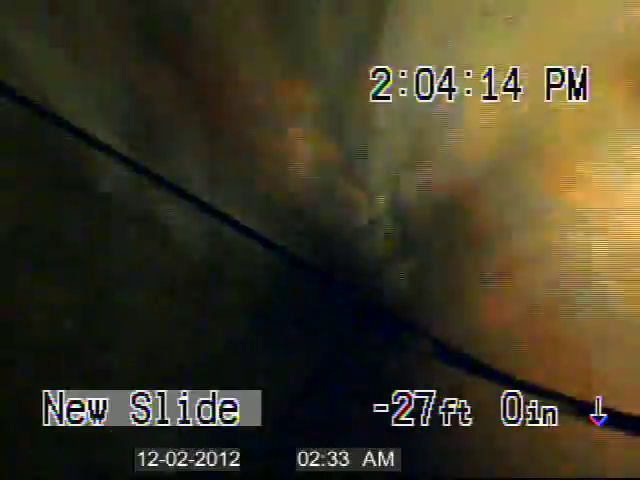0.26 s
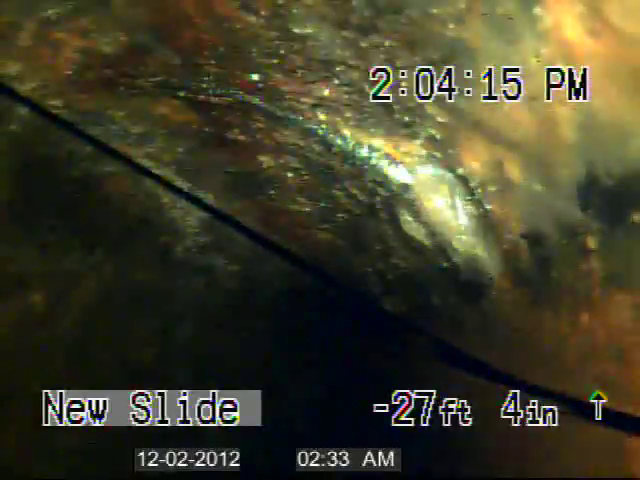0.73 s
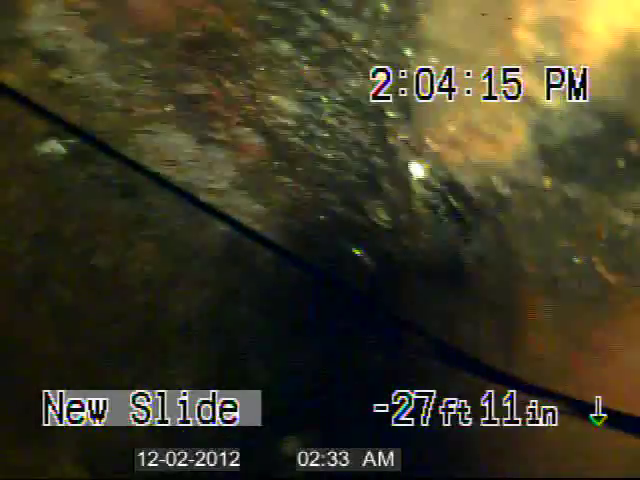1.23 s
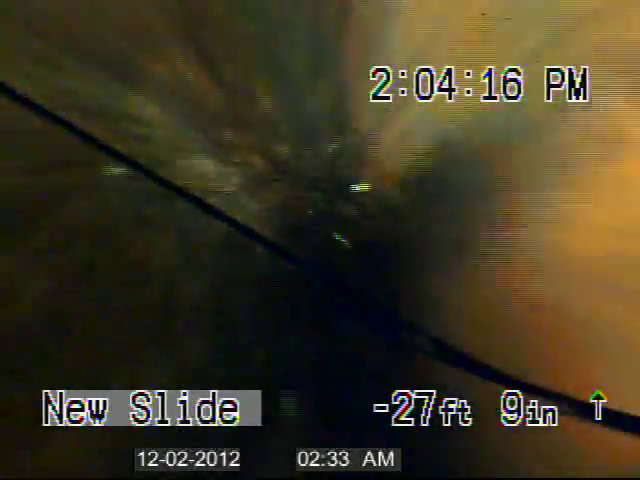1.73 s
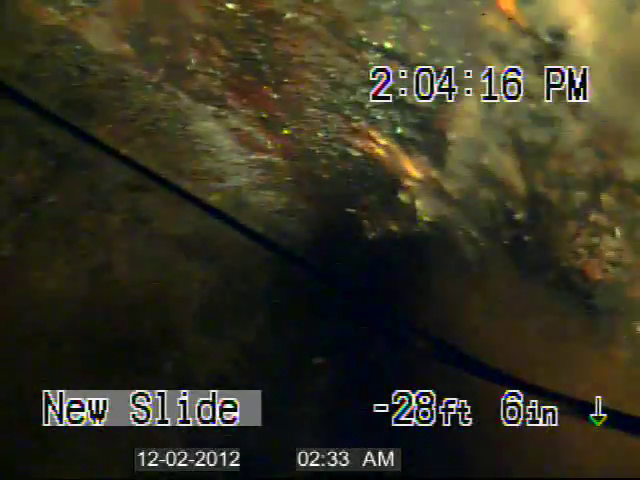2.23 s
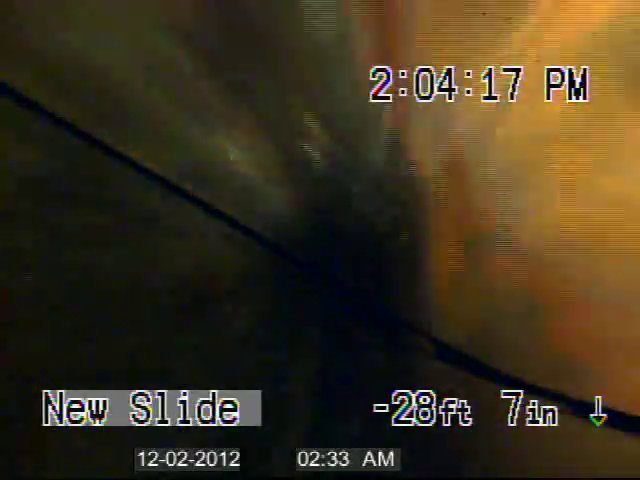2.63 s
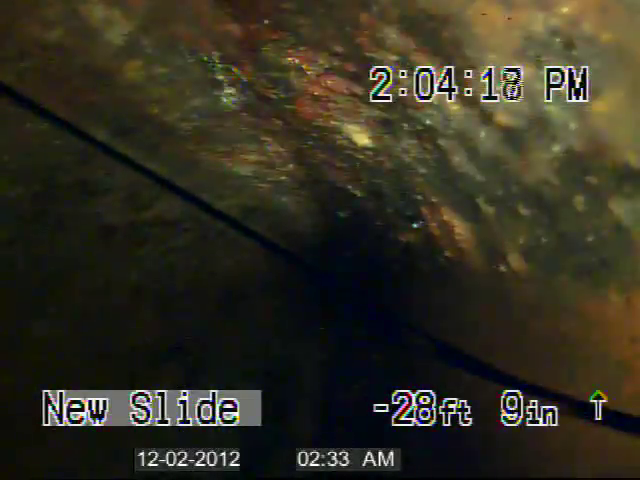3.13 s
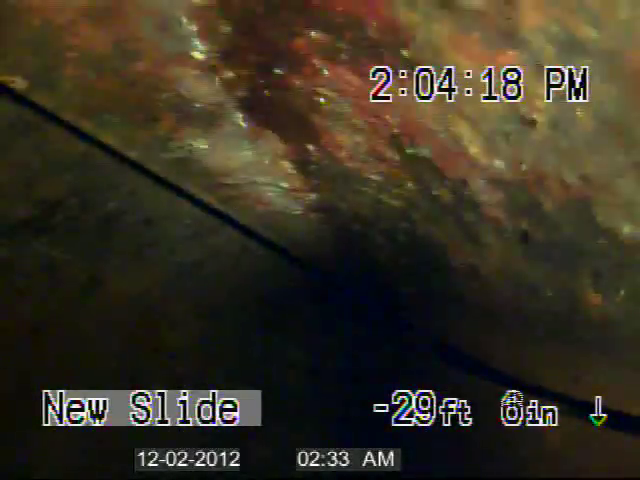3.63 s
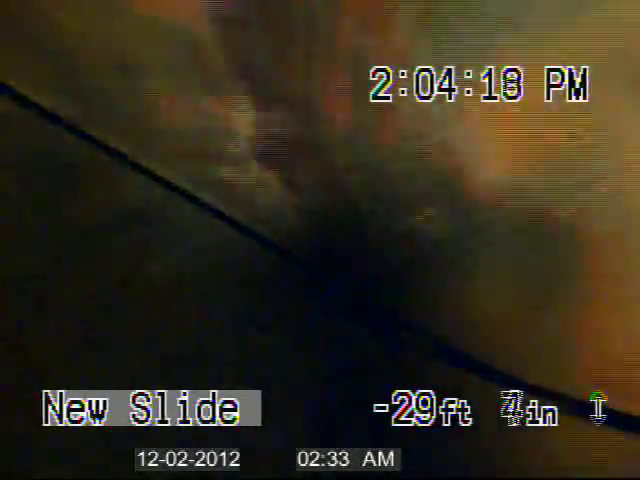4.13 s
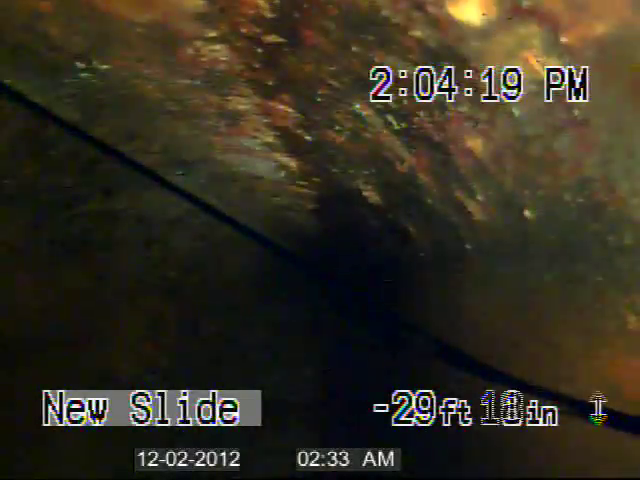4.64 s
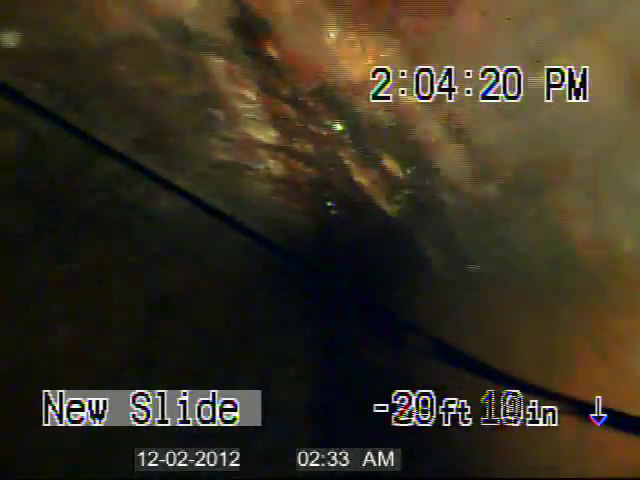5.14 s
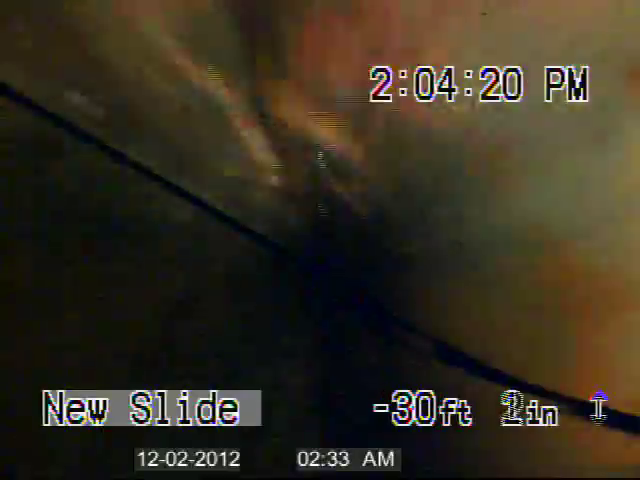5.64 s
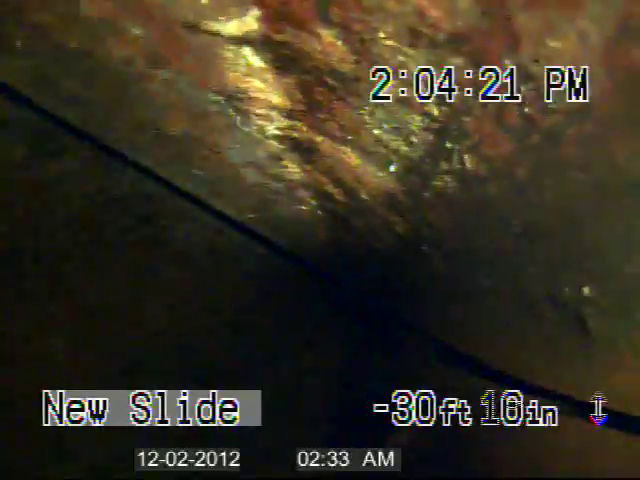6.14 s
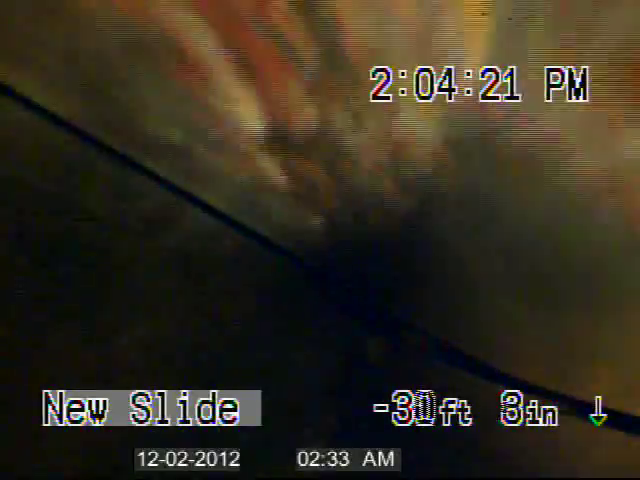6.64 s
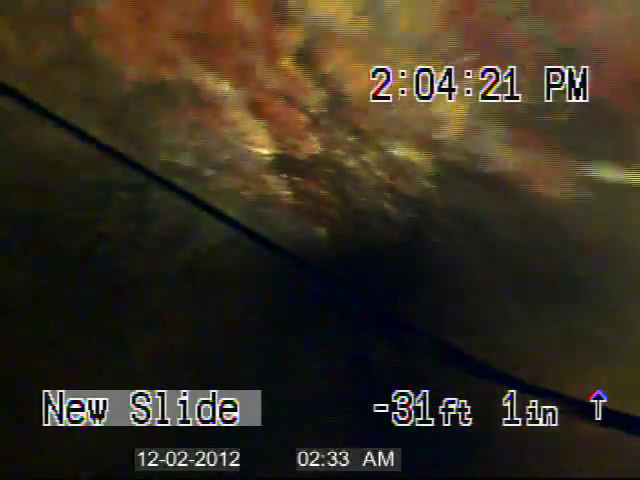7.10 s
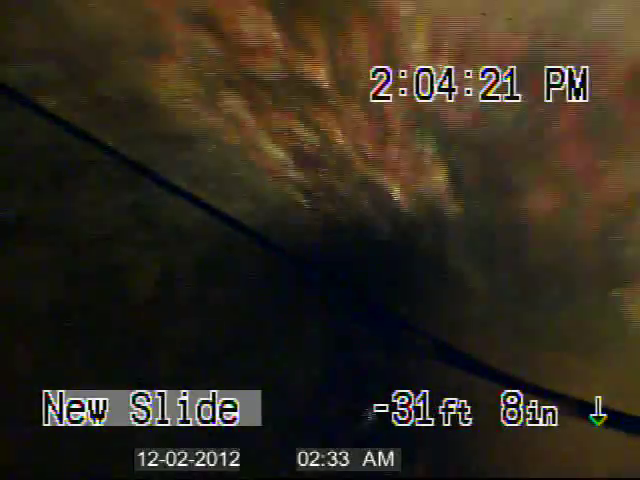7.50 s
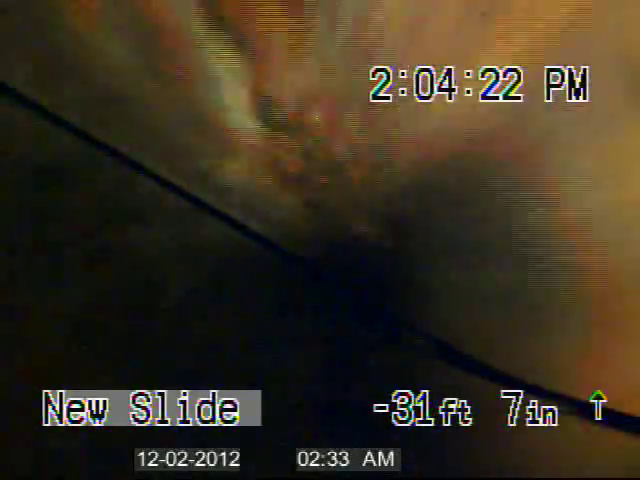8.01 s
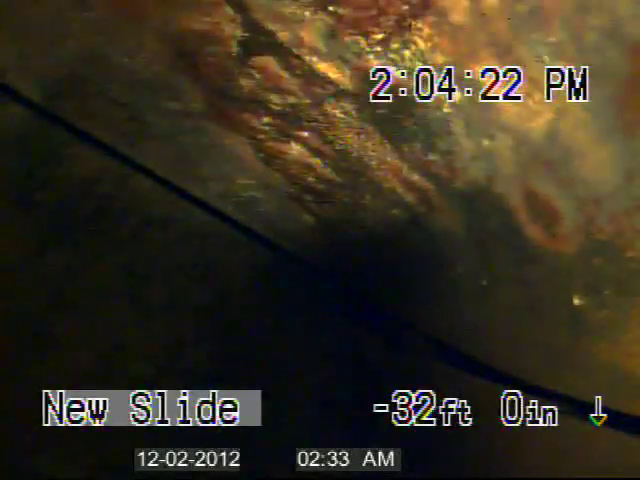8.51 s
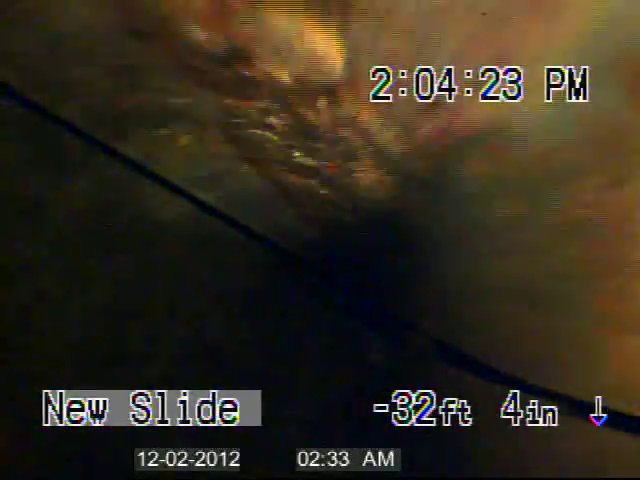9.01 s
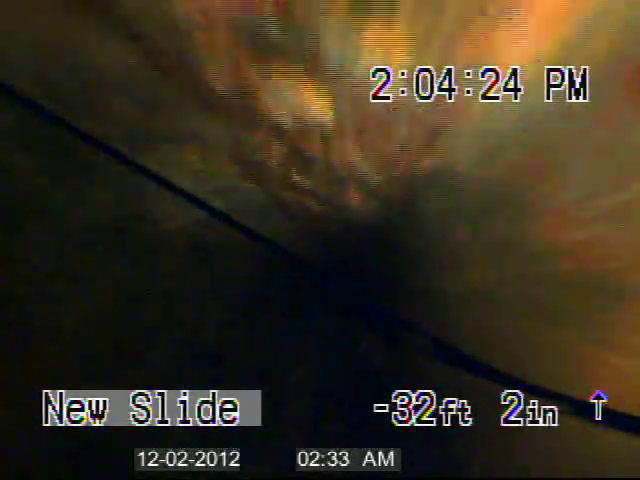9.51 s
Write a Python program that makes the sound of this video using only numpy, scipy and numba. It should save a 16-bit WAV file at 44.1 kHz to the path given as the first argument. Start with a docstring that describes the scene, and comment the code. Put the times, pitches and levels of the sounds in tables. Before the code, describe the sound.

A small hard camera head is shoved in short jerky strokes along a rusty pipe, scraping, rumbling and knocking, overloading its enclosed microphone.

```python
"""An inspection camera head is shoved along a rusty pipe in short strokes, its microphone inside the housing.
Stick-slip jolts drive the modes of body and rod, grit drives those of the thin shell, and wall knocks drive
both. Behind it the cable rumbles as low-passed noise, louder under drag, and a faint low hum wavers. Loud
strokes overload the input and square off, and a faint whine is added there; a broad treble hiss swells with the
loudness."""
import sys
import numpy as np
from scipy import signal
from scipy.io import wavfile
from scipy.ndimage import uniform_filter1d
from numba import njit

SR = 44100
rng = np.random.default_rng(int(sys.argv[2]) if len(sys.argv) > 2 else 0)


def store_pcm(level_fs):
    """Save levels as 16-bit WAV."""
    pcm = np.round(np.clip(level_fs, -1, 1) * 32767).astype(np.int16)
    wavfile.write(sys.argv[1], SR, np.atleast_2d(pcm).T)


N = 430416  # length in samples


def undb(db):
    """Level law: amplitude ratio of a level in dB."""
    return 10 ** (np.asarray(db) / 20)


def level(x, db):
    """Normalisation: scale a signal to the given rms level."""
    return x * undb(db) / np.sqrt(np.mean(x ** 2))


@njit
def svf(x, hz, width):
    """Second-order resonance: a state-variable band-pass with gain 1 at its centre."""
    y, band, low = np.empty(len(x)), 0., 0.
    g, k = np.tan(np.pi * hz / SR), width / hz
    for i in range(len(x)):
        v = (band + g * (x[i] - low)) / (1 + g * (g + k))
        band, low, y[i] = 2 * v - band, low + 2 * g * v, k * v
    return y


def lowpass(x, hz, order=2):
    """Low-pass filtering: a Butterworth response, flat below the corner."""
    return signal.sosfilt(signal.butter(order, hz, fs=SR, output="sos"), x)


def walk(rate):
    """Slow random modulation: normal random levels held 1 / rate s, then slewed twice."""
    k = int(SR / rate)
    held = np.repeat(rng.standard_normal(N // k + 1), k)
    return uniform_filter1d(uniform_filter1d(held, k), k)[:N]


def ring(x, modes, widen=1.44, patchy_db=0, passes=2):
    """Modal superposition: parallel resonances of alternating sign, their drive flickering with the contact."""
    out = 0
    for k, (hz, width, db) in enumerate(modes):
        y = x * undb(db + patchy_db * walk(30))
        for _ in range(passes):  # a second pass keeps the valleys between modes dark
            y = svf(y, float(hz), widen * width)
        out = out + (-1) ** k * y
    return out


HISS_DB, HISS_HZ, HISS_SWELL_DB = -57.5, 6940, 9.5  # level before swell and top cut, centre, swell per unit loudness


def hiss(loudness):
    """Band-limited noise: broad hiss whose level swells with the loudness of the moment."""
    steady = level(svf(rng.standard_normal(N), float(HISS_HZ), 4400.), HISS_DB)
    return steady * undb(HISS_SWELL_DB * loudness)


WHINE_HZ, WHINE_DB = 9744, -73


def whine():
    """Pure tone: a steady, faint high sine."""
    return np.sqrt(2) * undb(WHINE_DB) * np.sin(2 * np.pi * WHINE_HZ * np.arange(N) / SR)


# course of the faint low hum, interpolated between points, before its wavering: (t/s, f/Hz, rms level/dB)
HUM = [(0.0, 114.2, -17), (1.09, 118.3, -18.5), (1.301, 96.08, -21), (9.76, 103.3, -23.5)]
HUM_WAVER_HZ = 11  # scale of the random frequency waver


def hum():
    """Frequency modulation: a narrow tone, its phase the integral of a wavering frequency."""
    s, *columns = np.transpose(HUM)
    hz, db = (np.interp(np.arange(N) / SR, s, c) for c in columns)
    hz = hz + HUM_WAVER_HZ * walk(5)
    amplitude = np.sqrt(2) * undb(db + 2 * walk(12))
    return amplitude * np.sin(2 * np.pi * np.cumsum(hz) / SR)


RUMBLE_DB, RUMBLE_HZ = -11, 113  # level at 0 dB drag before its wavering, corner
RUMBLE_FOLLOWS = 0.51  # dB of rumble per dB of drag


def cable(drag_db):
    """Rolling friction noise: the cable rumbles on the pipe floor, louder while it is pushed."""
    rumble = level(lowpass(rng.standard_normal(N), RUMBLE_HZ), RUMBLE_DB)
    return rumble * undb(RUMBLE_FOLLOWS * drag_db + 2 * walk(6))


# slides of the head, long pushes, rebounds and short shuffles:
# (start t/s, attack t/s, hold t/s, release t/s, drag level/dB, change of level over the hold/dB,
#  grit level re drag/dB, upper body modes level/dB, upper shell modes level/dB)
SLIDES = [(0.0, 0.12, 0.21, 0.11, -3, 8, -24, -2, -1), (0.432, 0.064, 0.11, 0.068, 1, -3, -26.5, 1.5, 2),
          (0.722, .14, .22, .12, -9, 16, -22, -1.5, -1.5),
          (1.199, 0.052, 0.14, 0.065, -2, -0.5, -25.5, -2, 1.5),
          (1.427, 0.059, 0.0094, 0.027, -11.5, 5.5, -21.5, -2.5, -6.5),
          (1.573, 0.075, 0.26, 0.11, -8.5, 14.5, -22.5, -2.5, 0),
          (2.025, 0.069, 0.16, 0.022, 0, -6, -24.5, 3.5, 0),
          (2.318, 0.22, 0.13, .165, 2.5, 5.5, -28.5, -0.5, 2),
          (2.813, 0.042, .12, 0.066, -7, 6, -23.5, 1, -0.5),
          (3.07, 0.05, .01, 0.045, -11.5, -3.5, -28, -0.5, -2),
          (3.166, 0.19, 0.12, .09, 9.5, -0.5, -31, -4.5, 1.5),
          (3.564, 0.063, 0.13, 0.053, 2, -7.5, -26, -1, 0),
          (3.846, 0.022, 0.0073, 0.025, -5.5, -5, -28.5, 2, 4),
          (3.978, 0.11, 0.13, .178, 0.5, 5, -28, -2.5, 1), (4.365, 0.033, .09, 0.14, -7, 6, -24, 0.5, -0.5),
          (4.633, 0.024, 0.008, 0.04, -11.5, -0.5, -32, -2.5, 3.5),
          (4.753, 0.075, 0.24, 0.041, -4, 9.5, -24, -2, 1), (5.146, 0.035, 0.0056, 0.037, -4, 0, -26, 2, 2),
          (5.198, 0.04, 0.0078, 0.17, 0, 0.5, -24, -1.5, -1), (5.468, 0.038, .005, .03, -19, 7, -32, 1, 3),
          (5.534, 0.16, 0.18, 0.044, 3, -4, -27, -2, 1),
          (5.933, 0.072, 0.088, 0.11, -8, 6.5, -21.5, 4.5, -2.5),
          (6.244, .085, 0.2, 0.16, -8, 13, -23, 3.5, 1),
          (6.681, .055, 0.12, 0.12, -0.5, -6.5, -23.5, 2.5, -3),
          (6.967, 0.016, 0.0093, 0.018, -6, -1, -30, -4, 2.5),
          (7.057, .11, 0.19, 0.14, -9, 17.5, -21.5, -0.5, -0.5),
          (7.478, .04, .005, 0.048, 6, -5.5, -36, -1, -0.5),
          (7.528, 0.071, 0.17, 0.053, -5, -10, -27, 2, -2), (7.859, 0.12, 0.18, .09, 3.5, -3, -27, 0, -0.5),
          (8.257, 0.05, .005, 0.035, -1.5, -2.5, -27, 7, 0),
          (8.314, 0.049, 0.08, 0.079, 3.5, -3.5, -28, -4.5, -1),
          (8.6, 0.13, 0.17, 0.16, -8, 11.5, -22, -1.5, -0.5),
          (9.039, .025, 0.13, 0.19, -11, 10.5, -23.5, -0.5, -1),
          (9.445, 0.024, .005, 0.052, -3, 0, -37, -5, 5.5),
          (9.494, 0.044, .005, 0.057, 4, 1, -25, 1.5, 0.5),
          (9.54, 0.043, 0.13, 0.44, -4, 8.5, -23, -3.5, -1)]
REST_DB, REST_GRIT_DB = -19.5, -45.5  # drag and grit levels where a slide starts and ends
# curve exponents: 1 = straight in dB, more = rounder shoulders
ATTACK_BOW, HOLD_BOW, RELEASE_BOW = 1.15, 1.5, 1.2
GRIT_ATTACK_BOW, GRIT_RELEASE_BOW = 1.35, 1.42
RASP_SHARE, RASP_S = 0.12, 0.028  # dB of rasp per dB of rise over the hold; its time scale
GRIT_FOLLOWS = 0.71  # share of the change over the hold that the grit follows


def slides():
    """Envelope control: attack, hold and release in dB; the strongest drag sets drag, grit and colour."""
    t = np.arange(N) / SR
    out = np.zeros((4, N)) + np.array([[REST_DB], [REST_GRIT_DB], [0], [0]])
    for s, attack, hold, release, db, change_db, grit_db, upper_db, bright_db in SLIDES:
        at = slice(max(int(s * SR), 0), int((s + attack + hold + release) * SR))
        since_attack = t[at] - s - attack
        early = np.clip(1 - (t[at] - s) / attack, 0, 1)
        late = np.clip((since_attack - hold) / release, 0, 1)
        change = change_db * (1 - np.clip(1 - since_attack / hold, 0, 1) ** HOLD_BOW)
        drag_shape = 1 - early ** ATTACK_BOW - late ** RELEASE_BOW
        drag = REST_DB + (db + change - REST_DB) * drag_shape
        grit_shape = 1 - early ** GRIT_ATTACK_BOW - late ** GRIT_RELEASE_BOW
        grit_top = db + grit_db + GRIT_FOLLOWS * change
        grit = REST_GRIT_DB + (grit_top - REST_GRIT_DB) * grit_shape
        # a slide that gathers speed rasps around the end of its attack
        rasp = RASP_SHARE * max(change_db, 0) * np.exp(-(since_attack / RASP_S) ** 2)
        now = np.array([drag, grit + rasp, upper_db + 0 * drag, bright_db + rasp / 2])
        out[:, at] = np.where(drag >= out[0, at], now, out[:, at])
    return uniform_filter1d(out, int(.004 * SR), axis=1)


def slips(per_s, spread_db):
    """Stick-slip: random clicks of either sign, a few much larger than the rest; rms 1."""
    when, size, sign = rng.random((3, N))
    clicks = (when < per_s / SR) * undb(-spread_db * np.log(size + 1e-4))
    return level(clicks * np.sign(sign - .5), 0)


# knocks of the head against the wall, relative force levels: (t/s, crack level/dB, thud level/dB)
KNOCKS = [(0.044, -14, -4), (0.4971, 5, 5.5), (0.739, -21.5, -13), (1.2464, 1, 8), (1.3285, -1.5, -15),
          (1.34, -8, -12), (1.5746, -19, -12), (1.789, -3, -11), (2.0457, -8.5, -4.5), (2.0767, 5.5, 5.5),
          (2.3688, -16, -19), (2.841, 4.5, 4.5), (3.2135, -10, -12), (3.599, -2, -2), (3.6081, 7, 5.5),
          (3.8585, -17.5, -19), (3.941, -43, -10.5), (3.9752, -23, -9), (4.3957, 5, 4.5), (4.457, -3, -9),
          (4.6354, -19.5, -37), (4.66, -21, -16), (4.695, -18, -14), (4.795, -30, -8.5), (4.8248, -22, -19),
          (4.932, -13, -4), (5.1762, 1.5, 1.5), (5.2448, -6, 4), (5.4858, -17.5, -12.5), (5.51, -14.5, -11),
          (5.9491, -11, -7.5), (5.9949, -5.5, -5), (6.2907, -8.5, 0.5), (6.7128, -18, -1.5), (6.7309, 7, 5),
          (6.978, -15, -10), (7.119, -15, -12), (7.1611, -12, -2), (7.2427, -4, -5), (7.5134, 1, 7),
          (7.6147, -5.5, -3), (7.755, -35, -8), (8.301, 0.5, 4), (8.3649, -19, -9), (8.383, 2, -10),
          (8.576, -13.5, -10), (8.586, -24, -14), (9.0533, -10.5, -2.5), (9.2031, -10, -8),
          (9.468, -16, -4), (9.493, -10, -19)]
RATTLE_S = 0.0043  # decay time constant


def knocks(rise_s=0.0011, rattle_db=-12):
    """Impact excitation: one blow and a decaying rattle; returns the forces on shell and body."""
    t = np.arange(int(.1 * SR)) / SR
    rise, fade = 1 - np.exp(-t / rise_s), np.exp(-t / RATTLE_S)
    crack, thud, blow = np.zeros((3, N + len(t)))
    for (s, crack_db, thud_db), side in zip(KNOCKS, rng.random((len(KNOCKS), 1))):
        at = slice(int(s * SR), int(s * SR) + len(t))
        crack[at] += undb(crack_db) * rise * fade
        thud[at] += undb(thud_db + rattle_db) * fade
        blow[at.start] += undb(thud_db + 21.0) * np.sign(side[0] - .5)
    shell_force = crack[:N] * rng.standard_normal(N)
    body_force = blow[:N] + thud[:N] * rng.standard_normal(N)
    return shell_force, body_force


# modes of housing and push rod: (f/Hz, width before widening/Hz, relative drive level/dB)
BODY = [(138.4, 31.7, -7.5), (187.3, 38.5, -0.5), (222.2, 48, -0.5), (262.7, 61.2, -2), (382, 67.7, -8.5),
        (438, 61, -10), (597, 75, -23.5), (781, 99, -26)]
# modes of the thin shell of the head: (f/Hz, width before widening/Hz, relative drive level/dB)
SHELL = [(1333, 280, 2.5), (1715, 85, 3), (2000, 550, -1), (2800, 165, -1), (3163, 157, -1.5),
         (3920, 820, -13.5), (4830, 3100, -16.5)]
# mean click rates, and scales of the random click levels
JOLTS_PER_S, JOLT_SPREAD_DB, GRIT_PER_S, GRIT_SPREAD_DB = 2500., 2, 6000., 2.5
UPPER_FROM_HZ, BRIGHT_FROM_HZ = 330, 2500  # where the upper modes of body and shell begin


def head(drag_db, grit_db, upper_db, bright_db):
    """Source-filter principle: jolts, grit and knocks are forces, the modes of body and shell the filters."""
    jolts, grit = slips(JOLTS_PER_S, JOLT_SPREAD_DB), slips(GRIT_PER_S, GRIT_SPREAD_DB)
    crack, thud = knocks()
    body_rms, shell_rms = np.std(ring(jolts, BODY)), np.std(ring(grit, SHELL))
    # how the head lies against the wall shifts the weight of the upper modes
    touching = [(hz, w, db + bright_db * (hz > BRIGHT_FROM_HZ)) for hz, w, db in SHELL]
    lying = [(hz, w, db + upper_db * (hz > UPPER_FROM_HZ)) for hz, w, db in BODY]
    # rust lies in patches, so both forces waver quickly
    slide = ring(jolts * undb(drag_db + 1.48 * walk(40)), lying, patchy_db=2.0)
    scratch = grit * undb(grit_db + 2.1 * walk(50))
    # a knock is a briefer contact than a jolt: it starts at once and favours the upper body modes
    knock_force = undb(13) * svf(lowpass(thud, 1100.0), 462.0, 350.)
    clunk = ring(knock_force, BODY, widen=0.86, passes=1)
    shell_force = scratch + undb(-3.5) * lowpass(crack, 2280.0)
    shell = ring(shell_force, touching, patchy_db=2.5)
    return (slide + clunk) / body_rms + shell / shell_rms


def scene():
    """Superposition: head, cable and hum add; the slides control head and cable."""
    controls = slides()
    return (head(*controls) + cable(controls[0]) + hum())[None]


CEILING, KNEE, RAIL = .885, 40, .89  # clipping amplitude, sharpness exponent, final limit
COUPLING_HZ, SMOOTH_HZ, TOP_HZ = 8., 6240, 9900  # corners: high-pass, low-pass after clipping, top cut


def record(dry):
    """Nonlinear distortion: the input squares off loud strokes and adds a whine; a hiss swells with the
    loudness, then the top is cut."""
    coupled = signal.sosfilt(signal.butter(1, COUPLING_HZ, "high", fs=SR, output="sos"), dry)
    clipped = coupled / (1 + np.abs(coupled / CEILING) ** KNEE) ** (1 / KNEE)
    # rms over 25 ms, relative to the ceiling
    loudness = np.sqrt(uniform_filter1d(clipped ** 2, int(0.025 * SR)) + 1e-9) / CEILING
    noisy = lowpass(clipped, SMOOTH_HZ) + hiss(loudness)
    smooth = lowpass(noisy, 9300.0, order=4) + whine()
    limited = np.clip(smooth, -RAIL, RAIL)
    return signal.sosfilt(signal.ellip(10, .2, 90, TOP_HZ, fs=SR, output="sos"), limited)


dry = scene()
out = record(dry)
store_pcm(out)
```